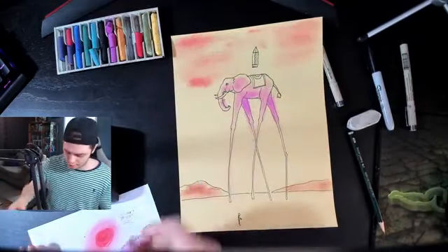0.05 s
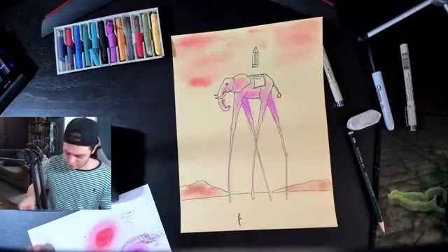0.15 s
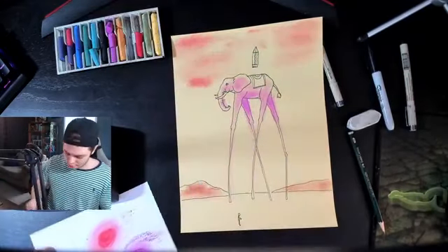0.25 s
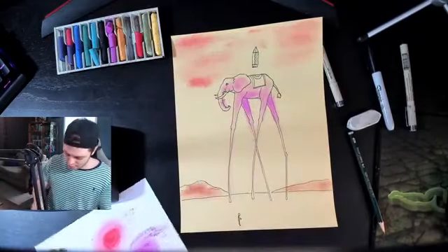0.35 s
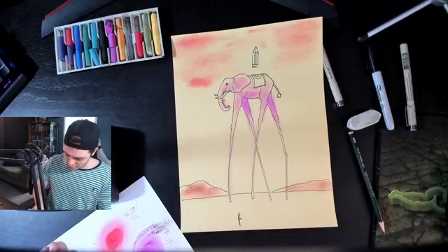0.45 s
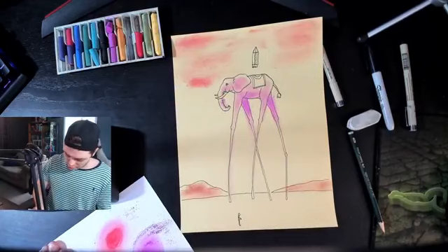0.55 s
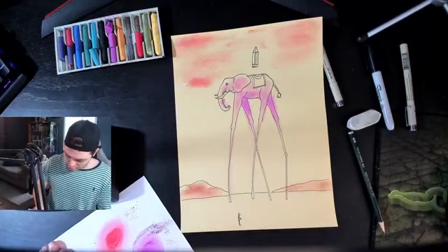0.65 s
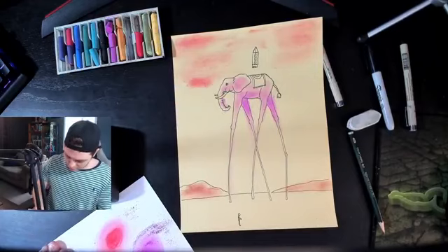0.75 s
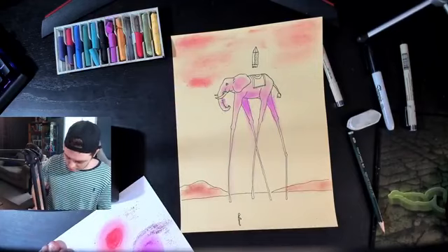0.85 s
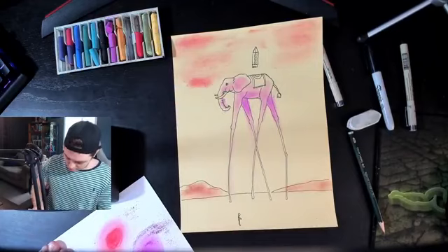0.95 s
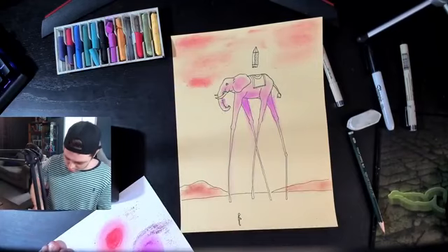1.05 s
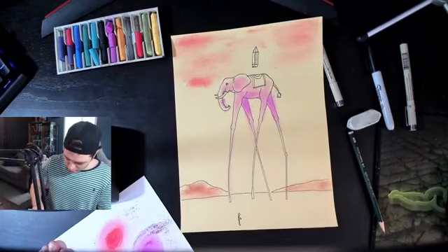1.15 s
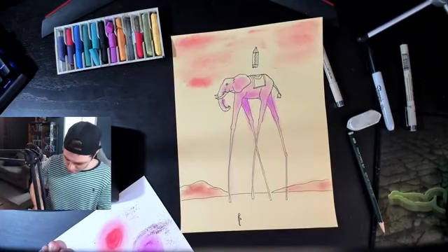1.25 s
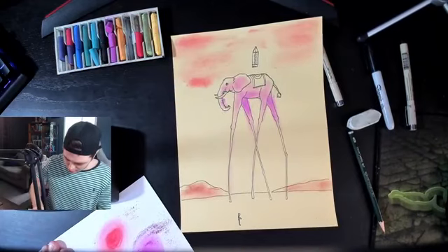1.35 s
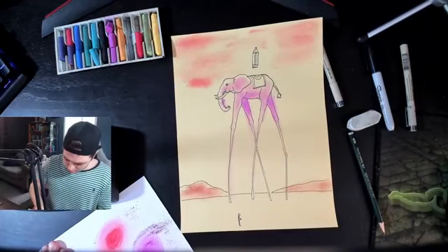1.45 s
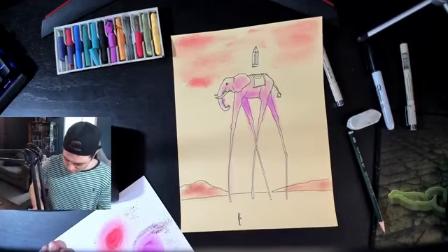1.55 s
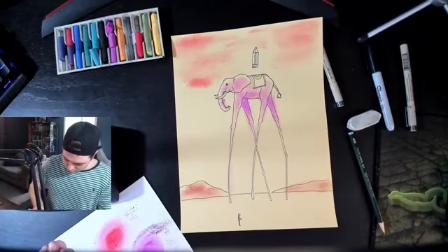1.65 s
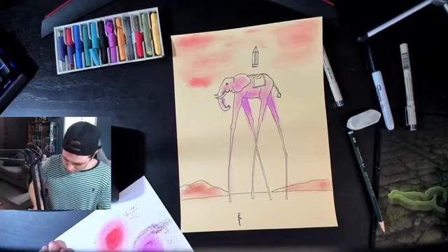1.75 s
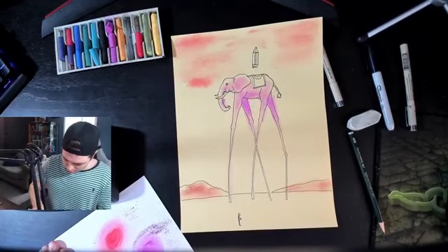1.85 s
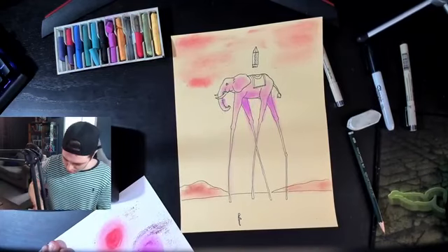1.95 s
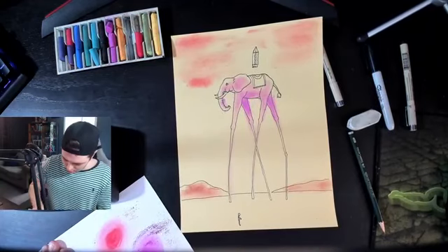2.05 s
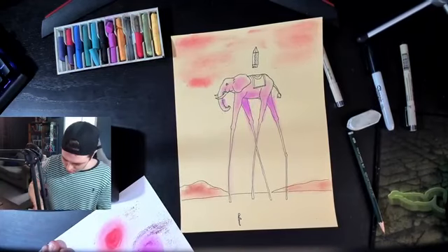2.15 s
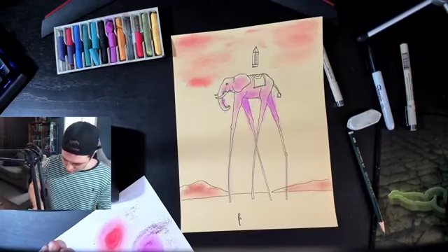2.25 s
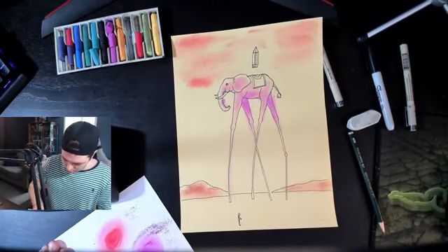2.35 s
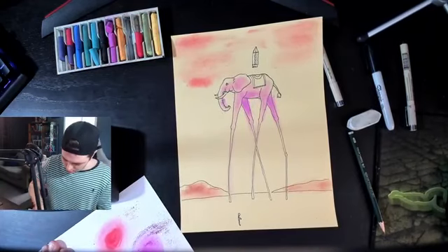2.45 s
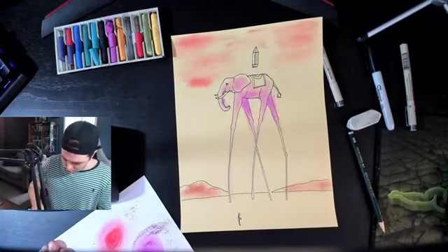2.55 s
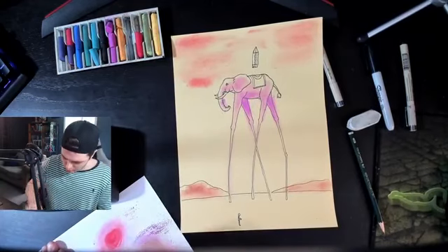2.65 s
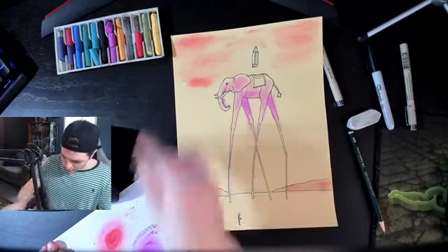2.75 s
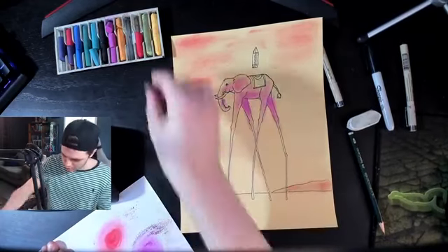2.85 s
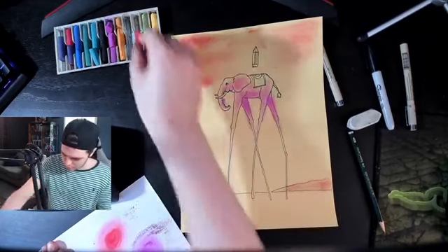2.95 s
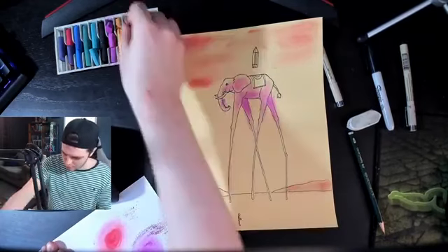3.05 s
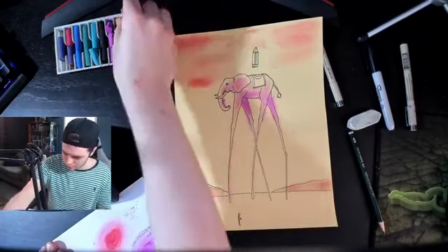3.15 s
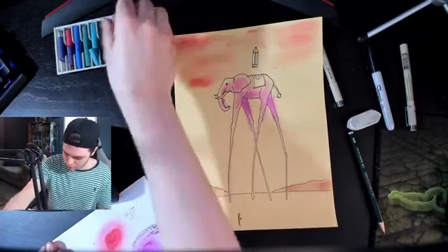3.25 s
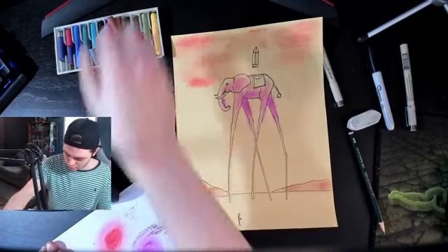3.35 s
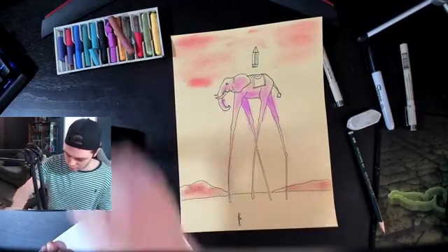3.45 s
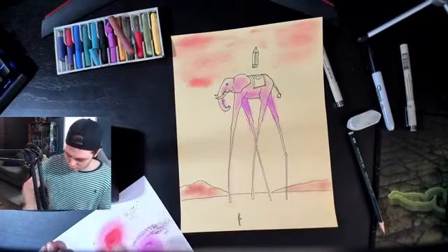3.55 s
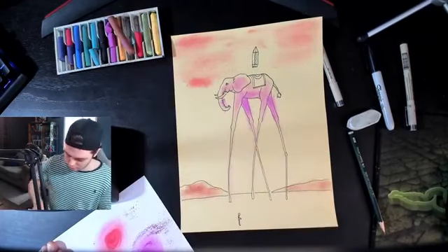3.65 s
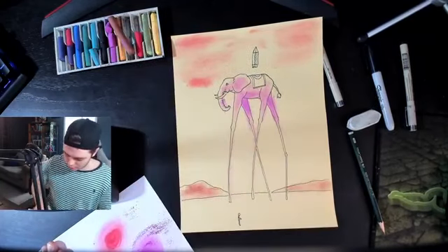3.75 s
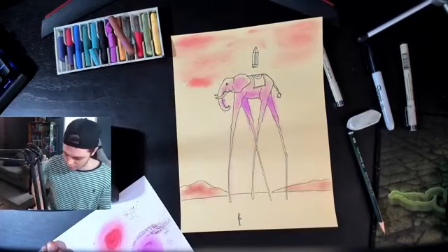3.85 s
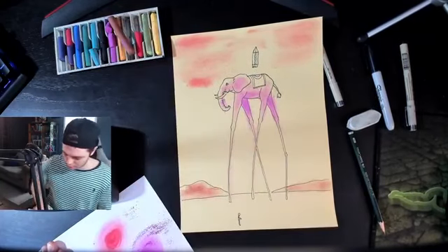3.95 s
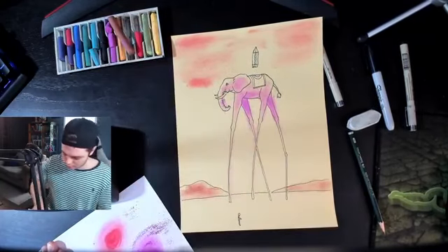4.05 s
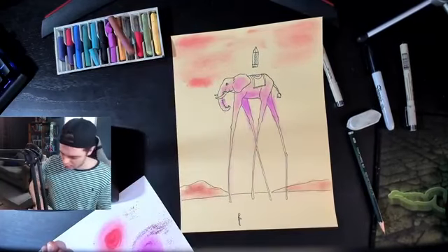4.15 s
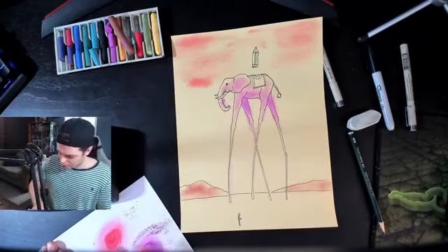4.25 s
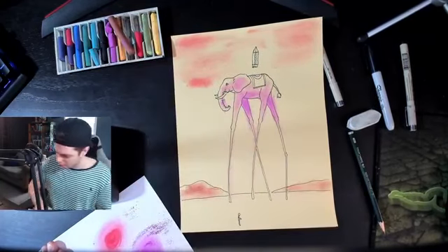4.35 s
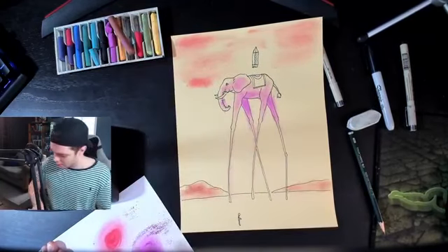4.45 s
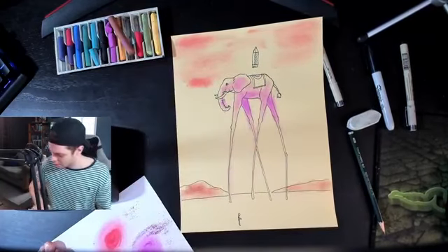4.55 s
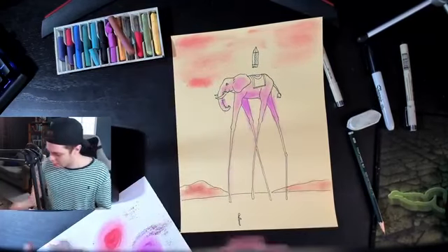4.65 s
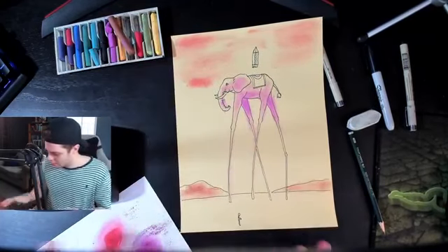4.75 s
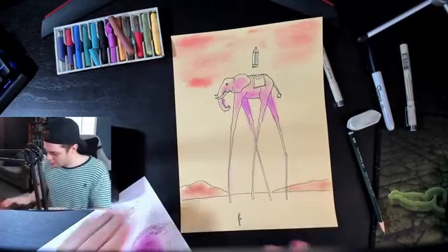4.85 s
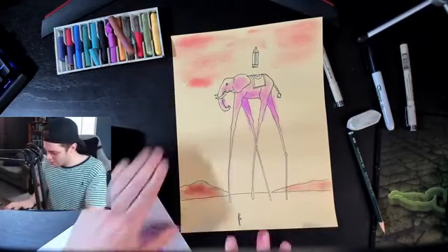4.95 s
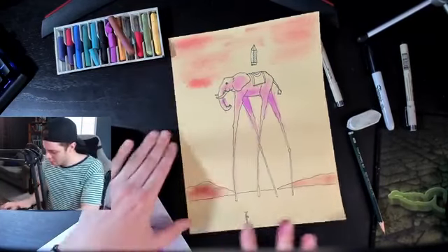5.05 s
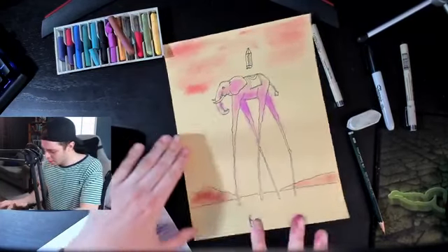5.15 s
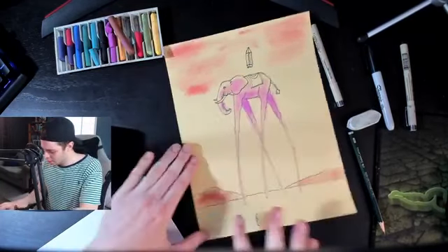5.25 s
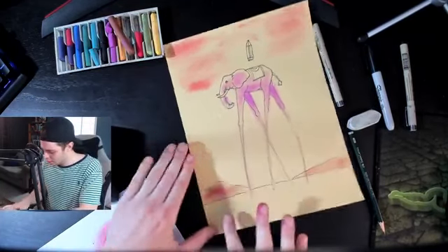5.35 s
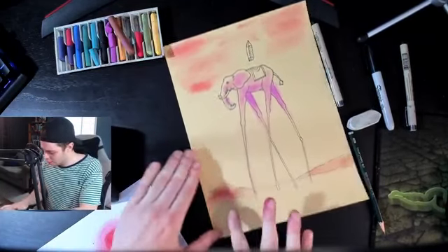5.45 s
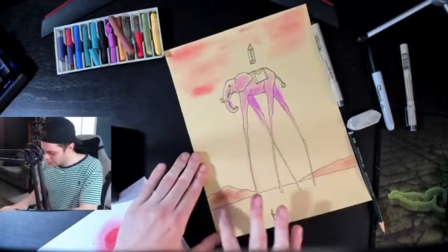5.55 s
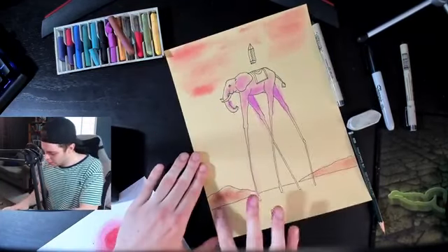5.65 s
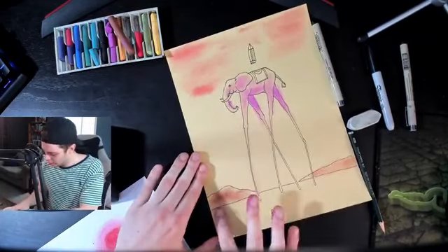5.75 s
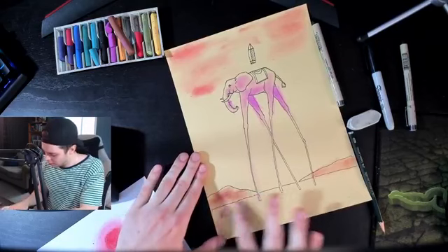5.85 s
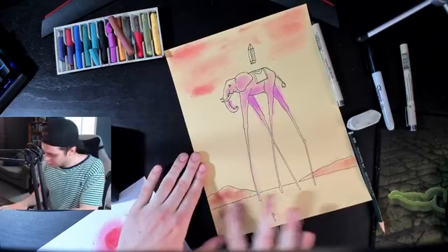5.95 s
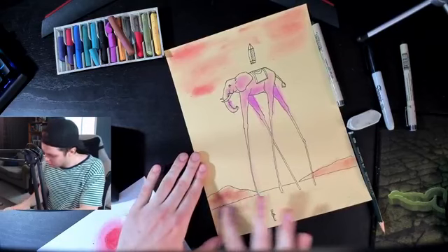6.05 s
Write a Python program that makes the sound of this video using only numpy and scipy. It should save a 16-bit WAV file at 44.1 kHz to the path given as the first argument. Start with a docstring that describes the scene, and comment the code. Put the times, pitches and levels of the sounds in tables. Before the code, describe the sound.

A chalky stick scratches quickly back and forth on paper, clatters into a box of sticks, then fingers smudge softly and a sheet slides.

```python
"""A soft pastel draws one long stroke across scrap paper, then shades back and forth, catching now and then.
Its hiss, and that of fingers smudging and turning the sheet, is friction: random slips through resonances.
The stick drops into its box: impacts ring the sticks, thud the desk and twang the springs of a microphone arm.
Handling adds small ticks and one soft knock; the small room hums faintly, and a desk microphone hears it close."""
import sys
import numpy as np
from scipy import signal
from scipy.fft import rfft, irfft, next_fast_len
from scipy.io import wavfile
from scipy.ndimage import uniform_filter1d

SR = 44100
rng = np.random.default_rng(int(sys.argv[2]) if len(sys.argv) > 2 else 0)


def log_audio(samples):
    """Write samples as a 16-bit WAV file to the path given in sys.argv[1]."""
    # one column per channel
    frames = np.atleast_2d(samples).T
    # limit to full scale, then quantise
    limited = np.clip(frames, -1, 1)
    pcm = np.round(limited * 32767).astype(np.int16)
    wavfile.write(sys.argv[1], SR, pcm)


N = 269186
T = np.arange(N) / SR  # time [s]
SIZE = 2 * next_fast_len(N // 2 + SR // 2)  # transform length, with room for the tails
HZ = np.maximum(np.arange(SIZE // 2 + 1) * SR / SIZE, 1)  # frequency of each bin [Hz]


def amp(db):
    """Level to gain: 20 dB is a factor of ten in amplitude."""
    return 10 ** (np.asarray(db) / 20)


def unit(x):
    """Normalization: scale to rms 1."""
    return x / np.sqrt(np.mean(np.abs(x) ** 2))


def shape(points):
    """Minimum phase: a causal response through (frequency [Hz], level [dB]) points, with power gain 1."""
    hz, db = np.transpose(points)
    log_gain = np.log(amp(np.interp(np.log(HZ), np.log(hz), db)))
    # folding the cepstrum onto positive time makes the response causal
    cepstrum = irfft(log_gain)
    cepstrum[1:SIZE // 2] *= 2
    cepstrum[SIZE // 2 + 1:] = 0
    return unit(np.exp(rfft(cepstrum)))


def resonances(modes):
    """Modal superposition: the summed response of damped oscillators, with power gain 1."""
    return unit(sum(amp(db) / (1 + 1j * hz / width * (HZ / hz - hz / HZ)) for hz, width, db in modes))


def lowpass(hz):
    """Contact compliance: a soft contact rolls off steeply above its corner frequency."""
    ratio = HZ / hz
    return 1 / (1 + 1j * np.sqrt(2) * ratio - ratio ** 2) ** 2


def through(x, response):
    """Linear filtering: multiply the spectrum of a sound by a frequency response."""
    return irfft(rfft(x, SIZE) * response)[:N]


def walk(rate):
    """Band-limited fluctuation: smooth chance of rms 1, changing about rate times a second."""
    k = max(int(SR / rate), 1)
    steps = np.repeat(rng.standard_normal(N // k + 1), k)[:N]
    return unit(uniform_filter1d(uniform_filter1d(steps, k), k))


def gliding_band(hz, width):
    """Modulation: slow complex noise on a carrier gives a narrow band round a moving centre, rms 1."""
    carrier = np.exp(2j * np.pi * np.cumsum(hz * np.ones(N)) / SR)
    return unit(np.real((walk(width) + 1j * walk(width)) * carrier))


def curve(rows, axis=1):
    """Envelope: the gain from one level column of a curve, silent outside its times."""
    rows = np.array(rows)
    level_db = np.interp(T, rows[:, 0], rows[:, axis])
    return amp(level_db) * (T >= rows[0, 0]) * (T <= rows[-1, 0])


def burst(start, t60):
    """Impact: a contact is a dense run of tiny random impulses that decays exponentially."""
    out, first = np.zeros(N), int(start * SR)
    age = T[:min(int(2 * t60 * SR), N - first)]
    out[first:first + len(age)] = rng.choice([-1, 1], len(age)) * amp(-60 * age / t60)
    return out


def friction(grain_rate, grain_db, flutter_db, flutter_rate):
    """Stick-slip: dense clicks of uneven size, bunched by the changing grip on the paper's tooth."""
    sizes = amp(grain_db * rng.standard_normal(N))
    slips = (rng.random(N) < grain_rate / SR) * rng.choice([-1, 1], N) * sizes
    return unit(slips * amp(flutter_db * walk(flutter_rate)))


def stroke_times(bouts):
    """Periodic motion: split bouts into even strokes (start [s], length [s], fastest share, dip [dB])."""
    times = []
    for start, end, count, fastest, dip_db in bouts:
        for s in np.linspace(start, end, count, endpoint=False):
            times.append((s, (end - start) / count, fastest, dip_db))
    return times


STROKE_SCATTER_DB = 0.4647  # chance difference from stroke to stroke


def strokes(bouts, power, dip_scale=1, push_db=0):
    """Reciprocating motion: the gain follows the speed of the hand and dips at each turn."""
    gain = np.zeros(N)
    for k, (start, length, fastest, dip_db) in enumerate(stroke_times(bouts)):
        inside = (T >= start) & (T < start + length)
        corners = start + length * np.array([0, fastest, 1])
        phase = np.interp(T[inside], corners, [0, np.pi / 2, np.pi])
        turn = amp(dip_db * dip_scale)
        strength = amp(push_db * (k % 2) + STROKE_SCATTER_DB * rng.standard_normal())
        gain[inside] = strength * (turn + (1 - turn) * np.sin(phase) ** power)
    return uniform_filter1d(gain, size=400)


# spectrum of the air: (frequency [Hz], relative level [dB per Hz])
ROOM_AIR = [(20, -31.5), (85, -22.5), (100, -21), (120, -6.5), (145, -16), (175, -2.5), (245, -11.5),
            (370, -10), (590, -15), (800, -12.5), (1100, -15.5), (2050, -24.5), (6000, -33.5), (16000, -38)]
ROOM_AIR_DB = -70.5
# fan and mains hum: (mean frequency [Hz], mean level [dB])
HUM = [(118.4, -89.5), (177.0, -76.5), (346, -87), (446.8, -82.5), (597.5, -83.5)]


def background():
    """Stationary noise: faint fan air, with hum tones wavering in pitch and level."""
    out = through(rng.standard_normal(N), shape(ROOM_AIR)) * amp(ROOM_AIR_DB + .5 * walk(6.3))
    for hz, db in HUM:
        pitch = hz * (1 + .006 * walk(11))
        tone = unit(np.sin(2 * np.pi * np.cumsum(pitch) / SR))
        out += amp(db + 1.1 * walk(12.0)) * tone
    return out


# ticks and squeaks of paper and fingers: (time [s], level [dB], centre [Hz], width [octaves], t60 [s])
HANDLING_TICKS = [(0.017, -65, 6000, 0.9, 0.18), (0.031, -69, 9400, 0.1, 0.45),
                  (0.2447, -57.5, 4340, 0.7, 0.09), (2.8407, -68, 2370, 0.94, 0.056),
                  (4.634, -60.5, 1500, 0.4, 0.23), (4.645, -53.5, 4850, 1.11, 0.163),
                  (4.698, -55, 2600, 1.12, 0.052), (4.945, -69.5, 1419, 0.16, 0.3),
                  (5.0392, -45, 3500, 0.92, 0.018), (5.0597, -44.5, 2996, 0.126, 0.021),
                  (5.503, -45, 6970, 0.7, 0.065), (5.632, -53, 4950, 0.14, 0.17)]


def ticks():
    """Impulse excitation: each small contact sounds through one narrow or broad resonance."""
    out = np.zeros(N)
    for s, db, hz, octaves, t60 in HANDLING_TICKS:
        # the width in octaves is taken as a share of the centre frequency
        out += amp(db) * through(burst(s, t60), unit(resonances([(hz, hz * octaves, 0)]) ** 2))
    return out


# how hard the pastel bears on the paper: (time [s], relative hiss level [dB], relative chalk body level [dB])
PRESSURE = [(0.6, -71.5, -65), (0.76, -57.5, -55), (0.83, -48.5, -55.5), (1.15, -48, -53),
            (1.4, -47.5, -54), (1.56, -46, -52), (1.9, -46, -50), (2.14, -42, -50), (2.39, -46, -55.5),
            (2.55, -39.5, -47), (2.63, -45.5, -42)]
# bouts of even back-and-forth strokes, the hand speeding up; slow ones loop round the turn, quick ones
# almost stop: (start [s], end [s], strokes [count], fastest point [share of stroke], relative turn dip [dB])
SHADING = [(0.6, 0.792, 1, 0.783, -16), (0.792, 1.1, 3, 0.396, -10), (1.1, 1.33, 2, 0.352, -10.5),
           (1.33, 1.51, 2, 0.344, -23), (1.51, 2.613, 13, 0.3486, -26.5)]
# the stick lands, and later snags hard: (time [s], chalk level [dB], desk thump level [dB])
LANDING_AND_SNAGS = [(0.247, -60.5, -61), (1.258, -48, -61), (1.444, -42, -79), (1.606, -36, -55),
                     (1.811, -43, -64.5), (2.127, -26.3, -46.5), (2.282, -43, -60)]
# every push from the second on catches as it sets off and again at speed:
# (time [share of stroke], chalk level re chalk body [dB], desk thump level re chalk body [dB])
PUSH_CATCHES = [(0.12, 2, -10), (0.5, 3, -10)]
CATCH_T60_S, CATCH_SCATTER_S = 0.0936, 0.003


def catch_events():
    """Static friction: the landing, hard snags and lighter push catches whose level follows the pressure."""
    times, _, body_db = np.transpose(PRESSURE)
    events = list(LANDING_AND_SNAGS)
    for start, length, _, _ in stroke_times(SHADING)[3::2]:
        db = np.interp(start, times, body_db)
        for share, chalk_db, thump_db in PUSH_CATCHES:
            s = start + share * length + CATCH_SCATTER_S * rng.standard_normal()
            events.append((s, db + chalk_db, db + thump_db))
    return events


# resonances of the chalky body on paper: (frequency [Hz], width [Hz], relative level [dB])
CHALK_MODES = [(371, 73, -29), (755, 84, -23), (1291, 73.7, -1), (1533.6, 117, 0), (1801, 34.1, 2.5),
               (1960, 34, -16.5), (2369, 69, 2), (2830, 147, -1.5)]
# spectrum of the desk: (frequency [Hz], relative level [dB per Hz])
DESK_THUMP = [(25, -9.5), (70, -16), (105, -5.5), (140, 5), (200, -11), (350, -12.5), (700, -13),
              (2000, -60)]


def catches():
    """Impulsive excitation: each contact rings the chalk body and thumps the desk."""
    events = catch_events()
    chalk = sum(amp(db) * burst(s, CATCH_T60_S) for s, db, _ in events)
    thumps = sum(amp(db) * burst(s, 0.1726) for s, _, db in events)
    chalk_response = unit(resonances(CHALK_MODES) * lowpass(2260))
    return through(chalk, chalk_response) + through(thumps, shape(DESK_THUMP))


# spectrum of the long stroke: (frequency [Hz], relative level [dB per Hz])
LONG_HISS = [(300, -21), (800, -16), (1400, -1.5), (2500, -2), (3300, -6), (4000, 4), (4700, 2), (5400, -1),
             (6400, -1), (7500, -5), (9800, -4), (10400, -11), (13000, -15), (16000, -22.5)]
# a quick attack, a short hold, then it eases off until the stick lifts
LONG_START_S, LONG_ATTACK_S, LONG_HOLD_S, LONG_END_S = 0.2685, 0.0303, 0.055, 0.578
LONG_DB, LONG_FADE_DB_PER_S, LONG_LIFT_DB = -49.5, 54.5, -10.6


def long_stroke():
    """Sliding friction: steady slips hiss under an attack, a hold and a fade that steps down at the lift."""
    age = T - LONG_START_S
    fade_db = LONG_FADE_DB_PER_S * np.maximum(age - LONG_ATTACK_S - LONG_HOLD_S, 0)
    level_db = LONG_DB - fade_db + LONG_LIFT_DB * (T > LONG_END_S)
    envelope = uniform_filter1d(np.clip(age / LONG_ATTACK_S, 0, 1) * amp(level_db), size=400)
    slips = friction(grain_rate=6500, grain_db=2.0, flutter_db=0.8538, flutter_rate=200)
    return through(slips * envelope, shape(LONG_HISS))


# resonances of the soft knock: (frequency [Hz], width [Hz], relative level [dB])
KNOCK_MODES = [(388, 430, -14.5), (665, 48, -1.5), (896, 268, 0), (1104, 57, 0), (1260, 56, -1),
               (1490, 86, -8.5), (1810, 76, -10.5)]
# a soft knock on the desk: (time [s], relative level [dB], t60 [s])
DESK_KNOCK = (0.5635, -39.5, .085)


def knock():
    """Modal response: a sharp contact and its longer decay excite the damped desk."""
    s, db, t60 = DESK_KNOCK
    contact = burst(s, t60) + amp(1.5) * burst(s, 0.0069)
    return amp(db) * through(contact, unit(resonances(KNOCK_MODES) * lowpass(1885)))


# scratchy resonances of the paper: (frequency [Hz], width [Hz], level re hiss effort [dB])
SCRATCH_MODES = [(2353, 160, -12.5), (4380, 550, -10)]
SCRATCH_SHIFT_DB, SCRATCH_SHIFT_RATE = 4.5, 11  # spread of the swelling, and its changes a second


def scratch(effort):
    """Moving excitation point: high paper resonances swell and fade independently."""
    out = 0
    for hz, width, db in SCRATCH_MODES:
        slips = friction(grain_rate=2200, grain_db=3.5, flutter_db=1.0, flutter_rate=120)
        swell = unit(amp(SCRATCH_SHIFT_DB * walk(SCRATCH_SHIFT_RATE)))
        out = out + amp(db) * through(slips * effort * swell, resonances([(hz, width, 0)]))
    return out


def paper(push, shift_db):
    """Modal coupling: under a moving contact each mode of the paper swells and fades on its own."""
    spectrum = rfft(push, SIZE) * lowpass(3370)
    total = np.sqrt(sum(amp(db) ** 2 * width for _, width, db in CHALK_MODES))
    out = 0
    for hz, width, db in CHALK_MODES:
        ring = irfft(spectrum * resonances([(hz, width, db)]))[:N]
        swell = unit(amp(shift_db * walk(16.126)))
        out = out + amp(db) * np.sqrt(width) / total * ring * swell
    return out


# spectra of shading hiss and desk rumble: (frequency [Hz], relative level [dB per Hz])
PASTEL_HISS = [(900, -27.5), (2000, -3), (2700, -11.5), (3300, -5.5), (3700, -7.5), (4400, -3), (5200, -10),
               (7000, -9.5), (8700, -10.5), (9900, -9.5), (10300, -15), (11500, -18.5), (13000, -26),
               (16000, -30.5)]
DESK_SCRUB = [(30, -17.5), (80, -12), (135, 2.5), (220, -24.5), (400, 0), (800, -2), (1100, 11.5),
              (2000, -24.5)]
PUSH_DB = 3  # every second stroke pushes against the paper's tooth, and its body rings louder


def shading():
    """Rate-dependent friction: slips hiss, brighter in quick strokes, and judder rings paper and desk."""
    effort = curve(PRESSURE, axis=1) * strokes(SHADING, power=1.28)
    slips = friction(grain_rate=6500, grain_db=2.0, flutter_db=0.8538, flutter_rate=200)
    hiss = through(slips * effort, shape(PASTEL_HISS))

    starts, lengths, _, _ = np.transpose(stroke_times(SHADING))
    pace = np.interp(T, starts, 1 / lengths)  # strokes a second
    dull = through(hiss, np.abs(lowpass(6200)))
    hiss = dull + (hiss - dull) * amp(1.176 * (pace - 12.5))

    judder = friction(grain_rate=2500, grain_db=4.5, flutter_db=0.0, flutter_rate=110)
    judder = judder * curve(PRESSURE, axis=2)
    body_motion = strokes(SHADING, power=1.39, dip_scale=0.64, push_db=PUSH_DB)
    body = paper(judder * body_motion, shift_db=1.5)
    # the high power confines the desk rumble to the fast middle of a stroke
    scrub_motion = strokes(SHADING, power=6.6, dip_scale=2.6, push_db=PUSH_DB)
    scrub = through(judder * scrub_motion, shape(DESK_SCRUB))
    return amp(-1.25) * hiss + scratch(effort) + amp(0.5) * body + amp(-14) * scrub


def stick_ring(start, hz, t60):
    """Free vibration: the bending mode of one struck stick is a decaying sine."""
    age = np.maximum(T - start, 0)
    return np.sqrt(2) * np.sin(2 * np.pi * hz * age) * amp(-60 * np.minimum(age / t60, 5))


# spectra of the clack and of the long ring of the box and things beside it:
# (frequency [Hz], relative level [dB per Hz])
CLACK_BODY = [(30, -31), (110, -28), (220, -10), (500, -31.5), (800, -24), (1250, -8), (2000, -3),
              (2500, -4.5), (2850, 0.5), (3600, -2.5), (5200, 2.5), (8000, -0.5), (9700, -6.5),
              (12000, -13.5), (16000, -32.5)]
BOX_TAIL = [(100, -21.5), (450, -7), (750, 1), (1200, 0.5), (1700, -1.5), (2200, -7), (3500, -13),
            (6000, -22.5), (12000, -46.5)]
# resonances of the sticks: (frequency [Hz], width [Hz], relative level [dB])
STICK_MODES = [(1938.7, 22, 6.5), (2960, 100, -16), (3198, 120, -2), (4450, 97, 3.5), (4640, 31, -9.5),
               (5888, 69, 0), (6235, 89, -0.5), (6640, 110, -1.5), (6800, 210, -7.5), (7690, 38, -6.5),
               (8693, 65, -7.5), (8420, 20, -11), (10466, 52, -4.5), (10900, 44, -19.5)]
# sticks clacking in their box: (time [s], relative level [dB], treble tilt [dB per octave], t60 [s],
# pitch of the struck stick [Hz], rebounds [count])
CLACKS = [(3.1995, -28, -7, .02, 2834, 0), (3.2469, -14.2, 0, 0.0362, 2767, 3),
          (3.3313, -36.5, -6, 0.035, 3730, 0), (3.3587, -21.5, -5.5, 0.032, 2150, 3),
          (3.439, -27.3, -4.5, 0.0356, 3160, 1), (3.5106, -38.5, -8, 0.0394, 2084, 2)]
# a stick rocks after a clack: (delay [s], level re clack [dB])
REBOUNDS = [(0.011, -13), (0.026, -10), (0.0395, -16.5)]
REBOUND_T60_S, REBOUND_TILT_DB = 0.074, -1  # rebounds are duller, by this extra tilt per octave
RATTLE_DB, RATTLE_GROWTH = -32, 0.42  # neighbours' level for a 0 dB clack, and share of its dB they follow
THUD_DB = -25  # the desk, relative to the clack


def box():
    """Collision: a crack rings one stick and jolts its neighbours, thuds the desk and rings the box longer."""
    ring = unit(shape(CLACK_BODY) * (1 + amp(-14.5) * resonances(STICK_MODES)))
    octaves = np.log2(np.clip(HZ, 2000, None) / 4000)  # the tilt pivots at 4 kHz and is flat below 2 kHz
    out, tail, thud = np.zeros(N), np.zeros(N), np.zeros(N)
    for s, db, tilt_db, t60, hz, rebounds in CLACKS:
        crack = amp(db) * (burst(s, t60) + burst(s, 0.0076))
        rattle = amp(RATTLE_DB + RATTLE_GROWTH * db) * burst(s, 0.254)
        rocking = np.zeros(N)
        for delay, drop_db in REBOUNDS[:rebounds]:
            rocking += amp(db + drop_db) * burst(s + delay, REBOUND_T60_S)
        out += through(crack + rattle, unit(ring * amp(tilt_db * octaves)))
        out += through(rocking, unit(ring * amp((tilt_db + REBOUND_TILT_DB) * octaves)))
        out += amp(db - 9) * stick_ring(s, hz, t60=.05)
        tail += amp(db - 28) * burst(s, .72)
        thud += amp(db + THUD_DB) * burst(s, .16)
    desk_response = unit(resonances([(245.7, 190, 0)]) ** 2)
    return out + through(tail, shape(BOX_TAIL)) + through(thud, desk_response)


# rings of the desk and arm springs: (final frequency [Hz], relative level [dB], t60 [s],
# starting pitch [share of final], noise [share of power])
TWANGS = [(130, -47.5, 0.3, 1.3, 0.7), (213.7, -35, 0.1266, 1.08, 0.2), (351.6, -33.5, .17, .8, .3),
          (483.5, -45.5, .22, .75, 1), (639.5, -53, .78, .6, .8), (1220.4, -43, .45, .73, 0.7),
          (1695, -51.5, .72, 0.74, .95)]
TWANG_START_S = 3.251  # set off by the hardest clack
TWANG_RISE_SHARE, TWANG_GLIDE_SHARE = 0.2107, 0.24  # swelling and gliding times as shares of t60
TWANG_WIDTH_HZ, TWANG_WIDTH_SHARE = 60, 0.085  # width of the blur: a base plus a share of the final pitch


def springs():
    """Dispersion: each wave family swells, glides to its final pitch and fades, blurred by crossing waves."""
    out, age = 0, np.maximum(T - TWANG_START_S, 0)
    for final_hz, db, t60, from_share, noisy in TWANGS:
        rise = TWANG_RISE_SHARE * t60
        swell = np.minimum(age / rise, 1) * amp(-60 * np.maximum(age - rise, 0) / t60)
        hz = final_hz * (1 + (from_share - 1) * np.exp(-age / (TWANG_GLIDE_SHARE * t60)))
        tone = unit(np.sin(2 * np.pi * np.cumsum(hz) / SR))
        blur = gliding_band(hz, TWANG_WIDTH_HZ + TWANG_WIDTH_SHARE * final_hz)
        out = out + amp(db) * swell * (np.sqrt(1 - noisy) * tone + np.sqrt(noisy) * blur)
    return out


# bouts of fingertip strokes: (start [s], end [s], strokes [count], fastest point [share of stroke],
# dip at the turn [dB])
SMUDGING = [(3.785, 4.335, 5, 0.446, -9), (4.335, 4.52, 2, 0.285, -16.5), (4.52, 4.6, 1, 0.41, -25),
            (5.848, 5.982, 1, 0.598, -17), (5.982, 6.1, 1, 0.347, -32.5)]
# how hard the fingertip rubs: (time [s], relative hiss level [dB], relative thin high ring level [dB])
TOUCH = [(3.78, -69.5, -86.5), (4.03, -56, -68), (4.4, -50.5, -57.5), (4.6, -57.5, -79), (5.85, -51.5, -61),
         (6.1, -51.5, -53.5)]
# spectrum of skin on powder: (frequency [Hz], relative level [dB per Hz])
FINGER_HISS = [(600, -30), (1600, -16.5), (2400, -7), (4100, -5.5), (4800, -3.5), (6500, -1.5), (7400, -1),
               (8500, 0.5), (9900, 2), (10400, -5.5), (11300, -7), (12500, -13.5), (16000, -16)]
# paper resonances under the finger: (frequency [Hz], width [Hz], relative level [dB])
SMUDGE_MODES = [(1872.4, 21.3, -1), (2390, 54, 1.9), (3057, 47, -2.4)]


def fingers():
    """Soft friction: skin on powder hisses high, faintly rings the paper and adds a thin ring as it grips."""
    motion = strokes(SMUDGING, power=1.406)
    slips = friction(grain_rate=18000, grain_db=4, flutter_db=0.83, flutter_rate=160)
    rub = slips * curve(TOUCH, axis=1) * motion
    ring = gliding_band(hz=8415, width=600) * curve(TOUCH, axis=2) * motion
    return ring + through(rub, shape(FINGER_HISS) + amp(-19.5) * resonances(SMUDGE_MODES))


# the sheet is turned in two shoves, each: (time [s], relative hiss level [dB], relative low rasp level [dB])
SHOVES = [
    [(5.03, -95, -90), (5.038, -48.5, -56), (5.066, -49, -59), (5.112, -58.5, -65), (5.14, -49.5, -54.5),
     (5.16, -46.5, -45), (5.198, -54, -69.5), (5.216, -53, -56.5), (5.234, -63, -74), (5.25, -61.5, -79)],
    [(5.25, -59, -78), (5.264, -60, -82), (5.296, -44, -61.5), (5.398, -44.5, -48.5), (5.486, -59, -72),
     (5.516, -48, -55.5), (5.578, -58, -70.5), (5.65, -55, -65), (5.732, -82, -99), (5.75, -85.5, -95.5)],
]
# pitch of the paper pressed under the fingers: (time [s], frequency [Hz])
PRESSED_PITCH = [(5.04, 3084), (5.24, 2911), (5.3, 5730), (5.4, 6200), (5.52, 5820), (5.62, 4900)]
# spectrum of the sliding sheet: (frequency [Hz], relative level [dB per Hz])
SHEET_HISS = [(60, -24), (500, -23), (1600, -24.5), (2400, -11), (4000, -7.5), (4600, 1.5), (5200, -2),
              (6300, 1.5), (7000, -3), (8200, -1), (9900, -6), (10500, -10.5), (12000, -8.5),
              (13000, -15.5), (16000, -26)]
# resonances of the rasping sheet: (frequency [Hz], width [Hz], relative level [dB])
SHEET_MODES = [(2444, 286, -0.05), (3007, 410, 1.5), (3255, 246, -2)]


def sheet():
    """Driven resonance: the sliding drawing hisses and rasps; its pressed patch shifts pitch with the grip."""
    slide = np.vstack(SHOVES)
    speed, grip = curve(slide, axis=1), curve(slide, axis=2)
    hiss = friction(grain_rate=13000, grain_db=4.5, flutter_db=1.86, flutter_rate=180) * speed * amp(-1.5)
    rasp = friction(grain_rate=2100, grain_db=0.0, flutter_db=0.5, flutter_rate=83) * grip * amp(-3.5)
    rasp_response = unit(resonances(SHEET_MODES) * resonances([(2910, 1320, 0)]))

    centre = np.interp(T, *np.transpose(PRESSED_PITCH))
    patch = unit(gliding_band(centre, width=450) + 0.47 * gliding_band(centre, width=1300))
    patch = patch * np.sqrt(speed * grip) * amp(-3.5)
    return patch + through(hiss, shape(SHEET_HISS)) + through(rasp, rasp_response)


def room(x, early_db, early_t60, late_db, late_t60):
    """Reverberation: quick reflections off the desk and a short, duller tail from the walls."""
    early = unit(rfft(burst(0.0012251, early_t60), SIZE))
    late = unit(rfft(burst(.012, late_t60), SIZE)) / (1 + 1j * HZ / 6000)
    return through(x, 1 + amp(early_db) * early + amp(late_db) * late)


def scene():
    """Superposition: one microphone hears the desk in its room, plus the springs and background directly."""
    pastel = catches() + long_stroke() + shading()
    desk = ticks() + pastel + knock() + box() + fingers() + sheet()
    reflected = room(desk, early_db=-10, early_t60=0.075, late_db=-12.5, late_t60=0.24)
    return (background() + reflected + springs())[None]


TOP_HZ = 15900


def record(dry):
    """Band limiting: the recorder cuts the top with a steep elliptic low-pass."""
    return signal.sosfilt(signal.ellip(10, .2, 70, TOP_HZ, fs=SR, output="sos"), dry)


dry = scene()
out = record(dry)
log_audio(out)
```